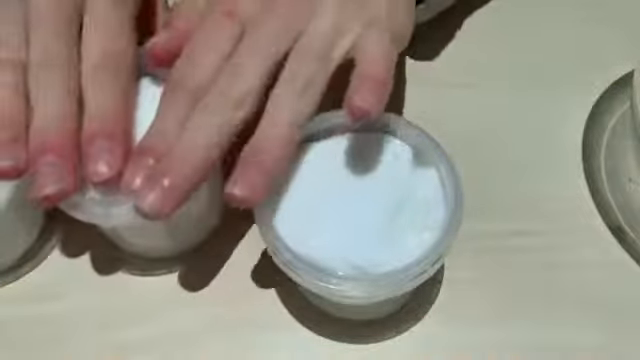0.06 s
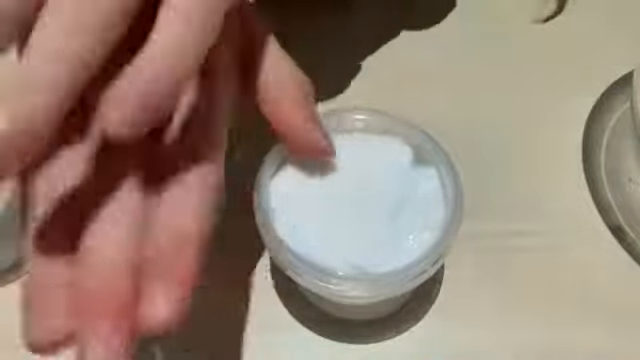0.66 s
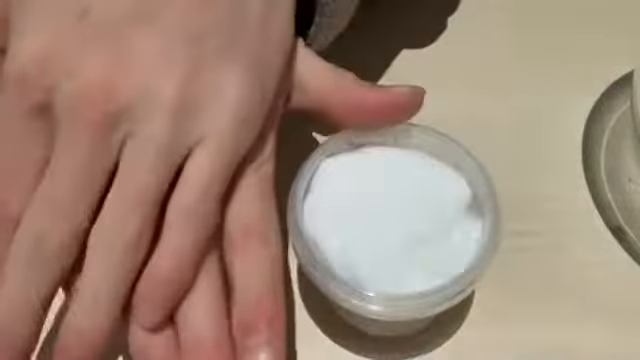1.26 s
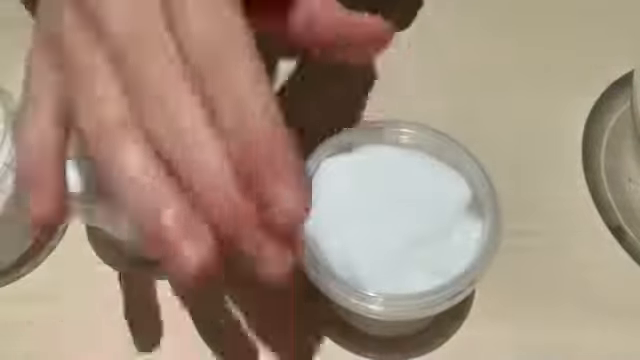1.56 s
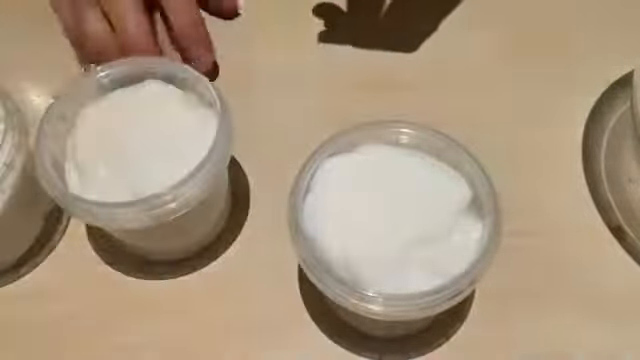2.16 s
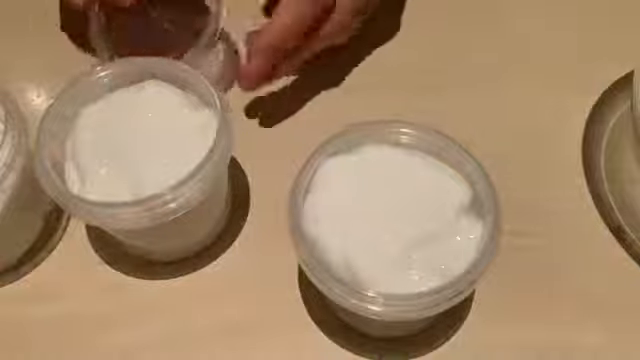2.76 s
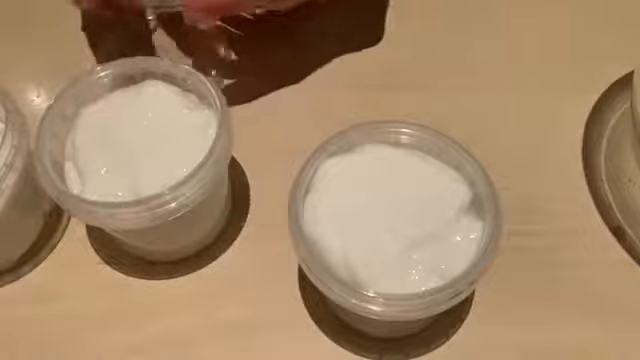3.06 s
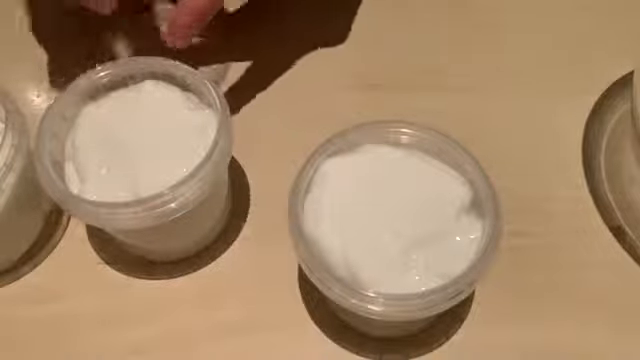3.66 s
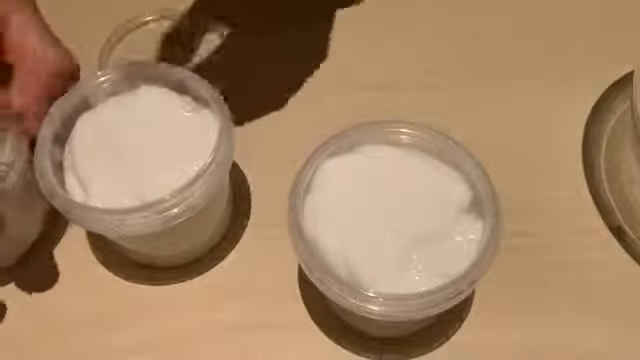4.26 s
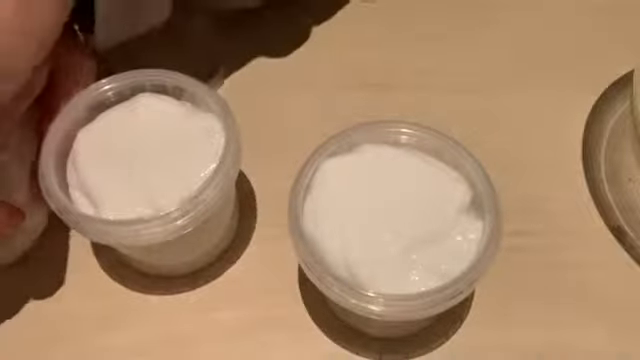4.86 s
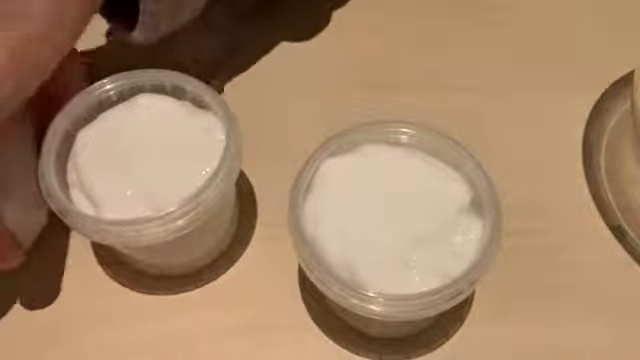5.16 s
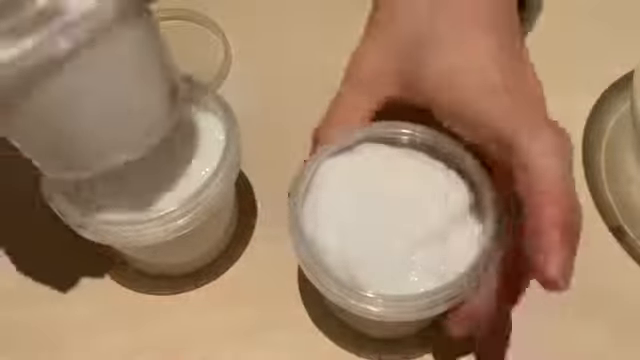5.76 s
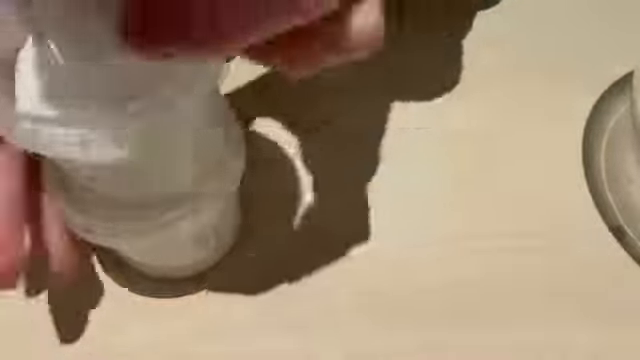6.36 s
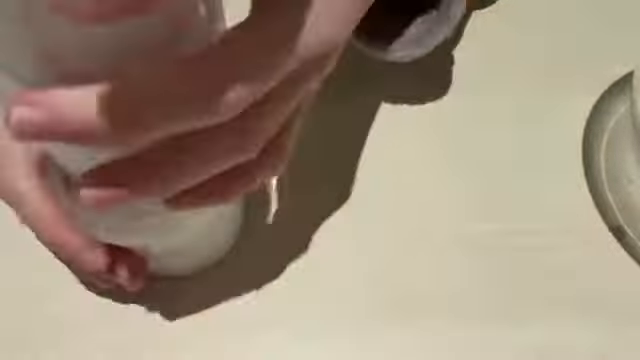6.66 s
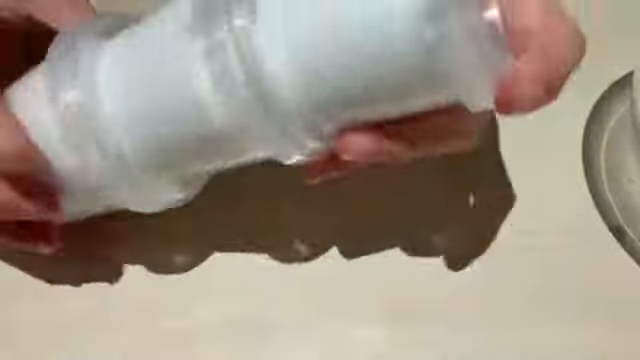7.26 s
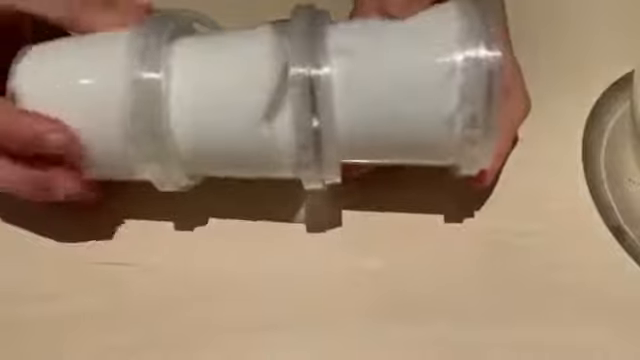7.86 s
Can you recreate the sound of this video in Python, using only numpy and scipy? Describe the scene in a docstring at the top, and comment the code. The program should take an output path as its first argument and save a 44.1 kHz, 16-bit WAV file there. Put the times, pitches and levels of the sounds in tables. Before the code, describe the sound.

Thin plastic lids snap, click and rub close by, then filled tubs are stacked with hollow clacks and low thumps on a wooden table.

```python
"""A small room, a wooden table, and thin plastic tubs handled close to a pair of microphones.
A palm slaps a lid shut, another lid is picked up and dropped, and the filled tubs are stacked
with low table booms. Rims tick and ring briefly, fingers and plastic rub in tiny slips,
and the tabletop thumps and rumbles under the arms."""
import sys
import numpy as np
from scipy import signal
from scipy.fft import rfft, irfft
from scipy.io import wavfile
from scipy.ndimage import uniform_filter1d

SR = 44100
rng = np.random.default_rng(int(sys.argv[2]) if len(sys.argv) > 2 else 0)


def log_audio(samples):
    """Write samples as a 16-bit WAV file to the path given in sys.argv[1]."""
    # one column per channel
    frames = np.atleast_2d(samples).T
    # limit to full scale, then quantise
    limited = np.clip(frames, -1, 1)
    pcm = np.round(limited * 32767).astype(np.int16)
    wavfile.write(sys.argv[1], SR, pcm)


N = 358091
TIME = np.arange(N) / SR
FREQS = np.fft.rfftfreq(N, 1 / SR)

# Colours of room air, table rumble and friction. Each row: frequency in Hz, relative level in dB.
AIR_COLOUR = [(200, -1.5), (600, 2.5), (1500, -1), (4000, -6.5), (9000, -10), (16000, -16)]
RUMBLE_COLOUR = [(18, -23), (35, -1), (55, 4), (125, -2), (155, -7.5), (200, -6.5), (400, -23.5),
                 (700, -57)]
FRICTION_COLOUR = [(300, 9.5), (2500, -3), (7000, -6.5), (16000, -8)]
# The room's tail. Each row: band centre in Hz, t60 in seconds, relative level in dB.
ROOM_DECAY = [(252, 0.46, 4), (1800, 0.45, 0), (5500, 0.43, -3.5), (11900, 0.2, 0)]
# Arms moving on the table. Each row: time in seconds, relative level in dB.
ARM_MOVES = [(0.0, -63), (1.91, -65.5), (2.07, -54), (2.61, -62.5), (3.11, -53.5), (5.32, -56),
             (5.6, -58.5), (6.54, -57), (7.31, -67.5), (8.1, -66.5)]
# Modes of the tabletop, the tub and lid walls, and a sliding rim.
# Each row: pitch in Hz, relative level in dB, t60 in seconds.
TABLE_MODES = [(111.8, -8.5, 0.53), (196, -2.5, 0.09), (283, -2.5, 0.14), (393, 2, 0.059), (562, -3.5, .03)]
WALL_MODES = [(706.7, -13.5, 0.045), (864, -7.5, 0.015), (1064, -9.5, 0.027), (1290, -10.5, 0.0065),
              (1700, -3, 0.013), (1850, -6.5, 0.023), (2440, -7, 0.01), (2585, -8.5, 0.02),
              (3166, -4.5, 0.016), (3850, -6.5, 0.0027), (7520, -3.5, 0.004), (10650, -3, 0.002)]
RIM_MODES = [(2519, -8, 0.025), (3900, -4, 0.0095), (4780, -5, .007), (6230, -6.5, 0.01),
             (9920, 0.5, 0.006)]
# Weight landing on the table.
# Each row: start in seconds, boom and knock in dB, how deep the boom is (higher is lower).
LANDINGS = [(0.939, -54, -41, 1), (1.993, -46, -46.5, 5), (3.911, -50, -45, 3.5), (4.209, -47, -60, 1),
            (4.634, -28.5, -24.5, 2.13), (5.765, -37.5, -47.5, 3.5), (5.958, -27, -77, 2.5),
            (6.24, -29.5, -38, 3.5), (6.452, -35, -66, 4), (6.582, -26, -43, 2.5), (6.918, -35, -47, 3)]
# Rubs on plastic, among them a brief bright scrape just before the lid snaps.
# Each row: peak and half length in seconds, mids in dB, treble over mids in dB.
PLASTIC_RUBS = [(0.257, 0.036, -60, -1.5), (.576, 0.02, -73.5, 15), (0.643, 0.033, -56.5, 3.5),
                (.934, 0.0088, -35, 10.5), (1.374, 0.025, -61.5, 6), (1.901, .02, -50.5, -12.5),
                (1.961, .028, -47, -11), (2.095, .014, -61.5, 6), (3.405, .02, -59, 14.5),
                (3.962, .026, -46, -1.5), (4.155, 0.022, -55, -5), (4.226, .02, -41.5, -0.5),
                (4.392, 0.23, -68, -2), (5.18, .07, -62, -1.5), (5.932, 0.046, -58, -5),
                (6.132, 0.07, -57.5, 2), (6.509, 0.07, -51.5, 0.5), (6.761, .027, -60, -3),
                (7.169, 0.013, -58.5, 12), (7.77, 0.042, -73.5, -2)]
# A rim sliding, hollow. Each row: as for a rub, then the lowest ring in Hz.
RIM_SLIDES = [(2.017, 0.092, -50.5, -4.5, 1700), (2.206, 0.017, -58.5, -7.5, 1650),
              (2.332, 0.026, -68, -3.5, 1680), (2.493, 0.036, -69, -3, 1710),
              (2.565, 0.033, -73.5, 7.5, 1700), (3.377, 0.045, -58, 5.5, 1800),
              (5.04, 0.1, -55.5, -3, 2220)]
# A fingertip creaking on a lid. Each row: peak and half length in seconds, level in dB, pitch in Hz.
LID_SQUEAKS = [(1.919, 0.0064, -34, 1567), (1.976, 0.0047, -36.5, 1520), (2.142, 0.002, -46.5, 1310),
               (2.176, 0.0082, -54, 1654), (3.417, 0.0093, -50.5, 1790), (6.559, 0.0049, -46, 1423)]
# A fingernail ticking on a rim. Each row: start in seconds, relative level in dB.
NAIL_TICKS = [(0.4377, -33), (.48, -43), (4.463, -35.5)]
# Plastic contacts. Each row: start in seconds, relative level in dB, ring of the touched spot in Hz,
# looseness of the grip from 0 to 1.
PLASTIC_TAPS = [(.2333, -52.5, 6300, 0.47), (.2555, -51.5, 2600, 0.7), (.2805, -55.5, 6390, 0.35),
                (1.368, -63, 920, 0.23), (1.9118, -32.5, 2670, 0.3), (1.994, -32, 1800, 0.6),
                (2.0922, -53.5, 3820, 0), (2.812, -65, 1550, 1), (2.908, -67.5, 1130, 0.4),
                (3.058, -60, 1238, 0.73), (3.2112, -47.5, 3166, 0.89), (3.782, -59.5, 1800, 0.73),
                (3.8648, -51.5, 1700, 0.56), (3.8955, -28.5, 1850, 0.52), (3.9075, -25, 2900, 0.55),
                (4.0608, -37, 1390, 0.66), (4.0642, -41.5, 1410, 0.9), (4.2075, -35, 3850, 0.37),
                (4.2105, -36, 4280, 0.3), (4.239, -46, 1380, 0.5), (4.4628, -55.5, 1700, 0.2),
                (4.711, -52, 1850, 0.14), (5.2338, -59, 6600, 0.07), (5.4097, -57, 591, 0.08),
                (5.461, -45, 1710, 0.59), (5.764, -41, 2640, 0.89), (5.858, -54, 650, 0.3),
                (5.942, -53, 606, 0.13), (6.298, -54, 3210, 0.22), (6.744, -62, 4530, 0.11),
                (6.9178, -55, 898, 0.92)]
# A filled tub set down or seated on another, clacking hollowly.
# Each row: start in seconds, relative bass, mids and treble in dB, three rings in Hz.
TUB_CLACKS = [(4.633, -35, -24.5, -32.5, 1770, 2430, 3240), (6.2421, -37, -35, -37, 720, 1640, 2830),
              (6.4543, -42, -30, -42, 1160, 1690, 3100), (6.5485, -41.5, -42, -45.5, 1147, 1395, 1660),
              (6.5865, -45.5, -48, -49, 380, 1850, 3050)]
# The lid's lip jumping into its groove. Each row: as for a clack, with one ring.
LID_SNAP = [(.9369, -40.5, -33.5, -24.5, 5500), (.9388, -38, -30, -18, 2912),
            (.941, -39.5, -39.5, -29.5, 419.5)]
# The plastic's bass, mid, treble and top bands. Each row: lower and upper edge in Hz.
TONE_BANDS = [(300, 1300), (1300, 4500), (4500, 9500), (9500, 15500)]
# The microphone pair's image. Each row: frequency in Hz, width in dB, left over right in dB.
MIC_IMAGE = [(59.4, -14, 0.64), (350, -3, 1), (844, 0.5, -1), (2562, -1, -2), (7320, -1, -0.5),
             (7620, -19.5, 3.5), (11800, -13.5, 1)]
# Phase between the microphones. Each row: frequency in Hz, lead of the left side in radians.
MIC_PHASE = [(1700, 0), (3000, -1.1), (6500, -2), (8000, -3.1), (10000, -3.2), (12000, -6.28)]

BAND_FILTERS = [signal.butter(3, band, "band", fs=SR, output="sos") for band in TONE_BANDS]
RING_CYCLES = 30   # a struck spot dies away within so many cycles
CRACK_T60_S = .013
LID_ALONE_START_S, LID_ALONE_END_S = 1.85, 3.7


def from_db(db):
    """Decibels to gain."""
    return 10 ** (np.asarray(db) / 20)


def rms_one(x):
    """Scale to rms 1."""
    return x / np.sqrt(np.mean(x ** 2) + 1e-20)


def at_hz(points, hz, column=1):
    """Read one column of a table along log frequency."""
    points = np.array(points)
    return np.interp(np.log(hz + 1e-9), np.log(points[:, 0]), points[:, column])


def decay(t, t60):
    """Fall by 60 dB every t60 seconds."""
    return np.exp(-np.log(1000) * t / t60)


def add(out, s, sound):
    """Mix a sound in at s seconds."""
    start = int(round(s * SR))
    first, last = max(start, 0), min(start + sound.shape[-1], N)
    out[:, first:last] += sound[..., first - start:last - start]


def noise(colour):
    """Stereo noise of a given colour, rms 1."""
    white = rfft(rng.standard_normal((2, N)))
    return rms_one(irfft(white * from_db(at_hz(colour, FREQS)), N))


def wander(samples):
    """A random drift that turns over so many samples, spread about 1."""
    return np.clip(rms_one(uniform_filter1d(rng.standard_normal(N), size=samples)), -2, 2)


def voiced(x, bass_db, mid_db, treble_db, top_db):
    """Set a sound's band levels; the harder the contact, the more of its treble lies in the top band."""
    top = from_db(top_db + np.clip(0.11 * (treble_db - mid_db), -3, 12))
    shares = [1, 1, 1 / np.hypot(1, top), top / np.hypot(1, top)]
    gains = from_db([bass_db, mid_db, treble_db, treble_db]) * shares
    return sum(gain * rms_one(signal.sosfilt(sos, x)) for gain, sos in zip(gains, BAND_FILTERS))


def thinning_db(s):
    """Bass lost while only the light lid is handled, with no filled tub to give it body."""
    return 16 * (LID_ALONE_START_S < s < LID_ALONE_END_S)


def room_air():
    """A faint, steady bed of air."""
    return from_db(-77.5) * noise(AIR_COLOUR)


def room_tail(send, build_s):
    """A diffuse tail that builds up within milliseconds and dies sooner in the treble."""
    t = TIME[:SR * 3 // 4]
    hz = np.fft.rfftfreq(len(t), 1 / SR)
    white = rfft(rng.standard_normal((2, len(t))))
    centres, tail = np.log([row[0] for row in ROOM_DECAY]), 0
    for share, (_, t60, db) in zip(np.eye(len(ROOM_DECAY)), ROOM_DECAY):
        band = irfft(white * np.interp(np.log(hz + 1), centres, share), len(t))
        tail = tail + from_db(db) * band * decay(t, t60)
    build_up = 1 - np.exp(-(t / build_s) ** 2)
    response = rms_one(tail * build_up) / np.sqrt(len(t))
    return signal.fftconvolve(send, response, axes=1)[:, :N]


def table_rumble(arms_db, drag_db):
    """The table rumbles under the arms, and every sliding stroke drags on it too."""
    arms = from_db(np.interp(TIME, *np.transpose(ARM_MOVES)) + arms_db)
    drag = sum(from_db(bass_db + drag_db) / (1 + ((TIME - s) / half_s) ** 2)
               for s, half_s, bass_db, *_ in stroke_tones(PLASTIC_RUBS + RIM_SLIDES))
    return np.hypot(arms, drag) * noise(RUMBLE_COLOUR)


def table_thumps(board_hz, sweep_hz, sweep_s, boom_t60):
    """Bending waves in the tabletop: the fast high ones arrive first, then the board booms."""
    out, t = np.zeros((2, N)), TIME[:SR * 3 // 4]
    attack = 1 - np.exp(-t / 0.0086)
    for s, boom_db, knock_db, depth in LANDINGS:
        boom_hz = board_hz / np.sqrt(1 + 0.86 * depth)
        turns = np.cumsum(boom_hz + sweep_hz * np.exp(-t / sweep_s)) / SR
        boom = from_db(boom_db) * np.sin(2 * np.pi * turns) * decay(t, boom_t60) * attack
        knock = 0
        for k, (hz, db, t60) in enumerate(TABLE_MODES):
            envelope = from_db(knock_db + db + rng.normal(0, 0.65)) * decay(t, t60)
            knock += (-1) ** k * envelope * np.sin(2 * np.pi * hz * rng.normal(1, 0.044) * t)
        add(out, s, boom + knock)
    return out


def friction(grain_db, stutter_db, catches_per_s, catch_db):
    """Sliding is a run of tiny uneven slips; now and then an edge catches and lets go with a crackle."""
    slips = noise(FRICTION_COLOUR) * from_db(grain_db * wander(70) + stutter_db * wander(600))
    catches = (rng.random(N) < catches_per_s / SR) * rng.uniform(-1, 1, N)
    return slips + from_db(catch_db) * catches


def stroke_tones(rows):
    """Give each stroke its bass, mids and treble: the brighter it is, the less bass it has."""
    for s, half_s, mid_db, bright_db, *rings in rows:
        bass_db = mid_db - 3.5 - bright_db - thinning_db(s)
        yield s, half_s, bass_db, mid_db, mid_db + bright_db, rings


def strokes(rows, body, slips, top_db, hollow_db):
    """Swells of friction ring the body's modes, which each grip tunes a little differently."""
    out = np.zeros((2, N))
    for s, half_s, bass_db, mid_db, treble_db, rings in stroke_tones(rows):
        first, last = np.searchsorted(TIME, [s - 3 * half_s, s + 3 * half_s])
        t = TIME[first:last] - s
        hz = np.fft.rfftfreq(len(t), 1 / SR)
        spots = [(ring, 0, RING_CYCLES / ring) for ring in rings]
        mode_hz, mode_db, t60 = np.array(body + spots).T[:, :, None]
        mode_hz = mode_hz * rng.normal(1, .012, mode_hz.shape)
        half_width_hz = np.log(1000) / (2 * np.pi * t60)
        resonances = from_db(hollow_db + mode_db) / (1 + ((hz - mode_hz) / half_width_hz) ** 2)
        rasp = irfft(rfft(slips[:, first:last]) * (1 + np.sum(resonances, axis=0)), len(t))
        swell = np.exp(-(t / half_s) ** 2)
        add(out, first / SR, swell * voiced(rasp, bass_db, mid_db, treble_db, top_db))
    return out


def grazes(contacts, half_s=.0065, gain_db=-13):
    """A rim never lands squarely: each contact gets a short scuffing stroke."""
    return [(s + half_s / 2, half_s, mid_db + gain_db, treble_db - mid_db)
            for s, _, mid_db, treble_db, *_ in contacts]


def handling(contacts):
    """Plastic rubs and scrapes, rims graze and slide, and the grip never quite stops rustling."""
    slips = friction(grain_db=2.2, stutter_db=2.2, catches_per_s=130, catch_db=24)
    rubs = strokes(PLASTIC_RUBS, WALL_MODES, slips, top_db=-4.5, hollow_db=6.5)
    rims = strokes(RIM_SLIDES, RIM_MODES, slips, top_db=-9, hollow_db=16)
    scuffs = strokes(grazes(contacts), WALL_MODES, slips, top_db=-6, hollow_db=6)
    grip = slips * from_db(-84 + 5.5 * wander(5000))
    return rubs + rims + scuffs + grip


def squeaks(waver):
    """Skin sticks and slips at one of the lid's pitches, which wavers with the pressure."""
    out = np.zeros((2, N))
    for s, half_s, db, hz in LID_SQUEAKS:
        t = np.arange(-2 * half_s, 2 * half_s, 1 / SR)
        pressure = rms_one(uniform_filter1d(rng.standard_normal(len(t)), size=90))
        turns = np.cumsum(hz * (1 + waver * pressure)) / SR
        swell = from_db(db) * np.exp(-(t / half_s) ** 2)
        add(out, s + t[0], swell * np.sin(2 * np.pi * turns))
    return out


def nail_ticks():
    """A nail slips off a rim: a tiny high burst, too light to set the wall ringing."""
    out, t = np.zeros((2, N)), TIME[:SR // 50]
    band = signal.butter(2, (9500, 14500), "band", fs=SR, output="sos")
    for s, db in NAIL_TICKS:
        burst = rng.standard_normal(len(t)) * decay(t, CRACK_T60_S)
        add(out, s, from_db(db) * signal.sosfilt(band, burst))
    return out


def tap_tones(rows, middling_spot_hz=1800):
    """Colour each tap: a stiffer spot trades bass for treble, a loose grip leaves mostly mids."""
    for s, mid_db, spot_hz, loose in rows:
        octaves = np.log2(spot_hz / middling_spot_hz)
        bass_db = mid_db - 1 - 5.5 * octaves - 6.5 * loose - thinning_db(s)
        treble_db = mid_db + 5.5 + max(octaves, 0) ** 2 - 20.5 * loose
        yield s, bass_db, mid_db, treble_db, spot_hz


def contact(t, spots, crack_db, crack_t60):
    """The rim catches: a spike, a crack of the thin wall, and the ring of the wall and struck spots."""
    # the grip detunes the wall
    wall = [(hz * rng.normal(1, .028), db + rng.uniform(-4, 4), t60) for hz, db, t60 in WALL_MODES]
    hz, level_db, t60 = np.array(wall + spots).T[:, :, None]
    phase = rng.uniform(0, 2 * np.pi, hz.shape)
    phase = phase + 0.28 * rng.standard_normal((2, len(hz), 1))   # each mode radiates its own way
    ring = np.sum(from_db(level_db) * decay(t, t60) * np.sin(2 * np.pi * hz * t + phase), axis=1)
    spike = t == 0
    grit = rng.standard_normal(len(t)) + .5 * rng.standard_normal((2, len(t)))
    return ring + from_db(crack_db) * (spike + grit * decay(t, crack_t60))


def strikes(rows, top_db, crack_db, crack_t60, spot_db):
    """Hits on thin plastic, 40 ms each, with their own ringing spots and band levels."""
    out, t = np.zeros((2, N)), np.arange(0, .04, 1 / SR)
    for s, bass_db, mid_db, treble_db, *rings in rows:
        spots = [(hz, spot_db, RING_CYCLES / hz) for hz in rings]
        hit = contact(t, spots, crack_db, crack_t60)
        add(out, s, .5 * voiced(hit, bass_db, mid_db, treble_db, top_db))
    return out


def scene():
    """Plastic hits up front, rubbing around them, the table and the room underneath."""
    touches = list(tap_tones(PLASTIC_TAPS))
    taps = strikes(touches, top_db=-12, crack_db=-4, crack_t60=CRACK_T60_S, spot_db=3) + nail_ticks()
    clacks = strikes(TUB_CLACKS, top_db=-9, crack_db=1.5, crack_t60=.009, spot_db=10)
    snap = strikes(LID_SNAP, top_db=-2, crack_db=24, crack_t60=.008, spot_db=0)
    # reverb only: the whole lid shudders, and the walls radiate all round, so no one mode stands out
    shudder = strikes(LID_SNAP, top_db=-4, crack_db=24, crack_t60=.12, spot_db=0)
    scatter = strikes(touches + TUB_CLACKS, top_db=-9, crack_db=6, crack_t60=.04, spot_db=-3)
    rubbing = handling(touches + TUB_CLACKS + LID_SNAP) + squeaks(waver=0.06)
    thumps = table_thumps(board_hz=123.6, sweep_hz=508, sweep_s=.0055, boom_t60=0.38)
    send = from_db(-14) * scatter + from_db(-7) * shudder
    send += from_db(-14.5) * rubbing + from_db(-9) * thumps
    tail = room_tail(send, build_s=0.0026)
    rumble = table_rumble(arms_db=5.5, drag_db=5)
    return taps + clacks + snap + rubbing + thumps + tail + rumble + room_air()


def record(dry):
    """The close pair narrows the image and turns the phase; peaks are rounded and the top is cut."""
    left, right = rfft(dry)
    mid = (left + right) / 2
    side = (left - right) / 2 * from_db(at_hz(MIC_IMAGE, FREQS))
    balance = from_db(at_hz(MIC_IMAGE, FREQS, column=2) / 2)
    left_lead = np.exp(1j * at_hz(MIC_PHASE, FREQS))
    pair = np.array([(mid + side) * balance * left_lead, (mid - side) / balance])
    high_cut = signal.ellip(10, .2, 80, 15700, fs=SR, output="sos")
    return signal.sosfilt(high_cut, np.tanh(irfft(pair, N)))


dry = scene()
out = record(dry)
log_audio(out)
```